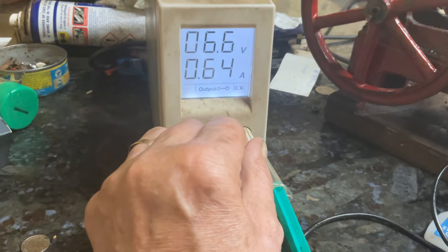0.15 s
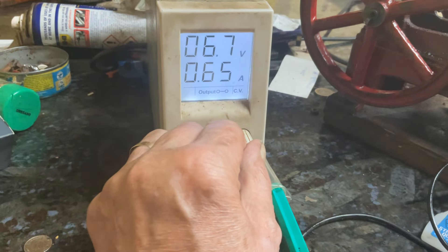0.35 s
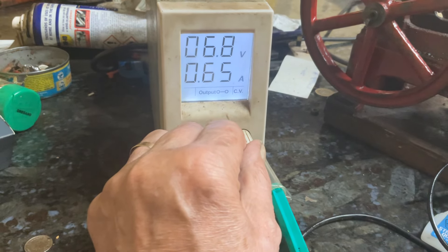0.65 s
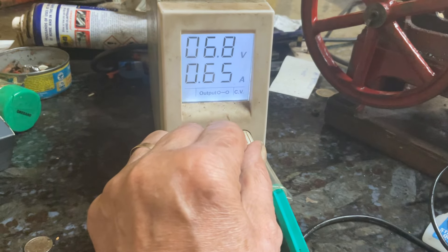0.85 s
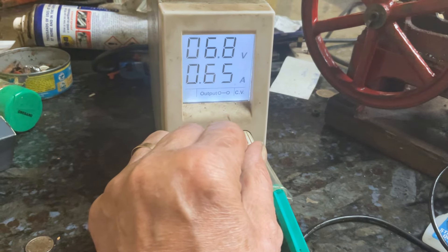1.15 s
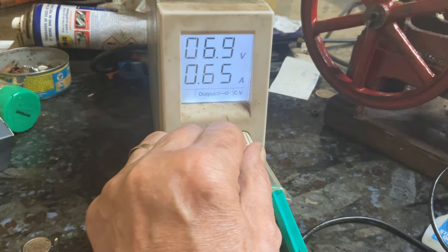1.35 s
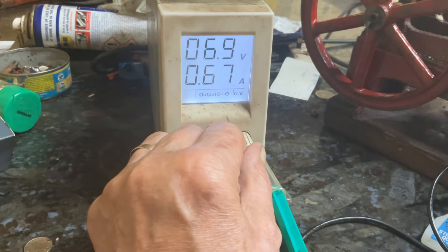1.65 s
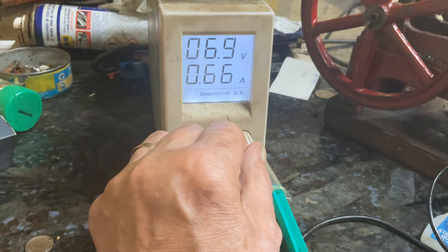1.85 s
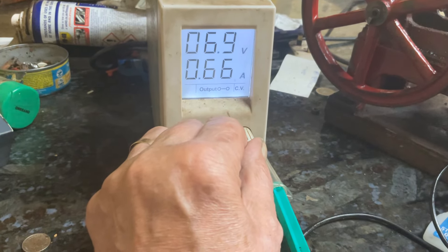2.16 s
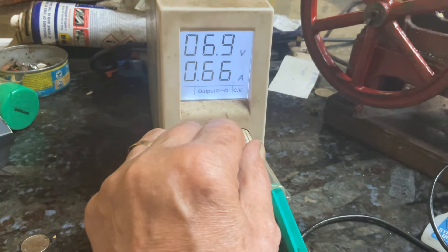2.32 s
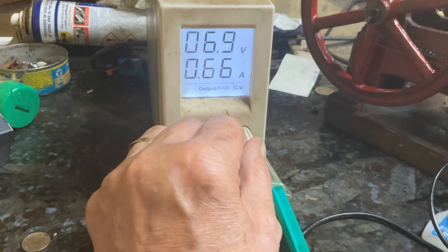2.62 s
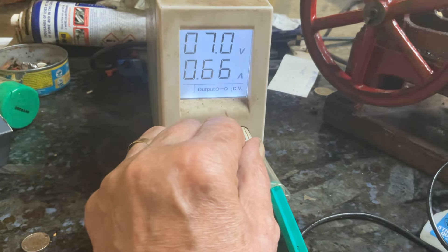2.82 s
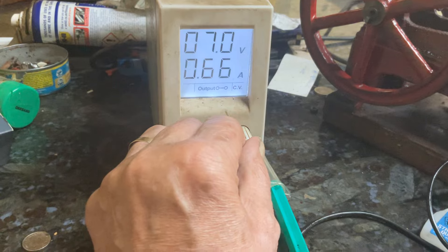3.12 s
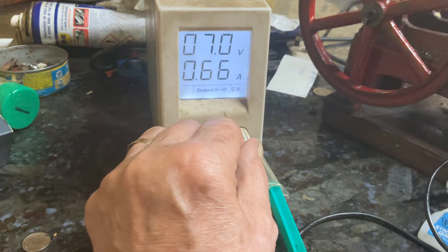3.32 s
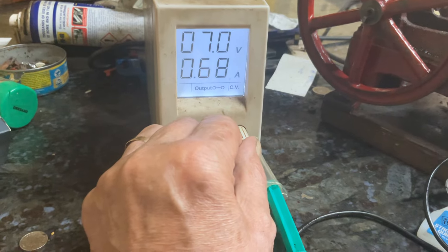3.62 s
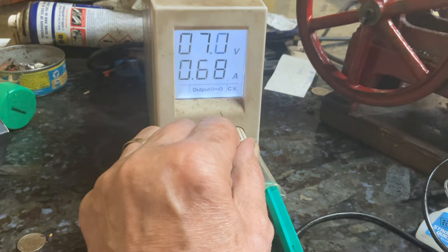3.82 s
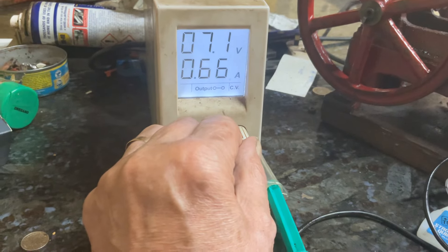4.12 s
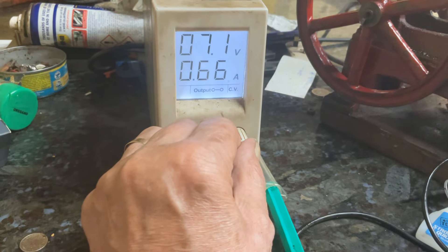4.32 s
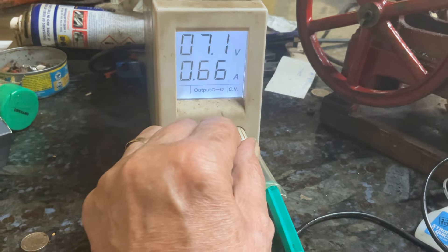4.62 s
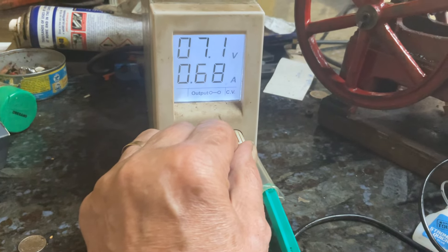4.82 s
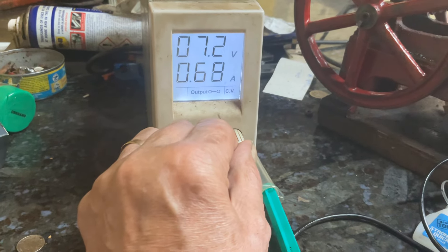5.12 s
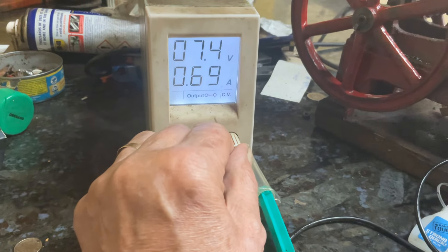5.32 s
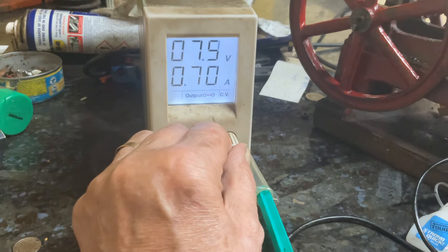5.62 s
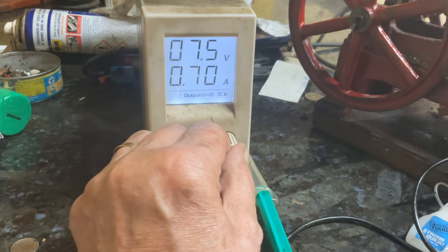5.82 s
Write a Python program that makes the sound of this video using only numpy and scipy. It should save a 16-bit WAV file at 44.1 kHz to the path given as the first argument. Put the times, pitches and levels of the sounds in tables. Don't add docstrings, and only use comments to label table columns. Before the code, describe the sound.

A spark unit on a cluttered workshop bench is already firing at the start and never stops for the full six seconds. About sixty-six slightly uneven cracks a second fuse into a harsh, dry, rasping buzz, with strong metallic sizzle around six to seven kilohertz and hiss up to about fifteen. Tight bench echoes and a short diffuse ring keep it dense. The close microphone overloads irregularly, adding short falling low pops and tiny dips in the crackle. Small pops cluster at 0.3-0.6 s; scattered stronger ones follow from 0.8 to 2.3 s. From 2.5 to 3.3 s they are heaviest, thumping and sputtering. They ease to scattered knocks from 3.4 to 5 s, while the rate quickens noticeably near 4.8 s, reaching about eighty a second. Another rough burst comes around 5.6-5.9 s. A steady, very faint low rumble remains underneath, and firing continues to the cut.

```python
import sys
import numpy as np
from scipy import signal
from scipy.fft import rfft, irfft
from scipy.io import wavfile
from scipy.ndimage import uniform_filter1d

SR = 44100
rng = np.random.default_rng(int(sys.argv[2]) if len(sys.argv) > 2 else 0)


def file_out(sig):
    cols = np.atleast_2d(sig).T
    lim = np.clip(cols, -1, 1)
    pcm = np.round(lim * 32767).astype(np.int16)
    wavfile.write(sys.argv[1], SR, pcm)


def boost_factor(decibels):
    exponent = np.asarray(decibels, float) / 20
    return 10 ** exponent


N = 263178
LEAD = 16384

# (t/s, time between sparks/ms)
SPARK_PERIOD = [(0, 15.2), (.55, 15.2), (.65, 14.5), (4.7, 14.3), (4.9, 13.4), (5.2, 12.9), (6, 12.5)]
# (t/s, level/dB, arc position 0-1)
SUPPLY = [(0, 0, -3.5), (2, 0, -2), (4.2, 0.5, 0.4), (4.9, 0, .8), (6, 0, 0.9)]
# (delay/ms, level/dB below 4.5 kHz, level/dB up to 9 kHz, level/dB above)
ECHOES = [(0.0, 2.5, -1, 0), (0.45, -7, -3, -7), (1.0, -7, -9, -9), (1.79, -9, -3, -5),
          (2.47, -9, -10, -14), (3.47, -10, -12, -9), (6.1, -11, -15, 2), (6.67, -17, -14, -6),
          (7.03, -11, -12, -1), (7.39, -12, -13, -1), (7.89, -13, -6, -3), (8.41, -5.5, -9, 3),
          (9.07, -9, -9, 1), (9.73, -10, -9, 1), (10.48, -12, -13, -16), (11.16, -13, -8, -12),
          (11.52, -13, -8, -10), (11.9, -18, -13, -9), (12.54, -13, -11, -15), (14.26, -13, -14, -12),
          (15.87, -15, -10, -6), (16.35, -12, -13, -11), (17.37, -15, -11, -11), (19.02, -11, -4, -7),
          (20.0, -12, -10, -10), (20.57, -16, -12, -6)]
# (lowest f/Hz, highest f/Hz, level/dB, t60/s)
SHOP_RING = [
    (60, 1500, -33, .3),
    (1500, 4500, -28, .28),
    (4500, 9000, -19.5, .27),
    (9000, 18000, -21, .28),
]
# (f/Hz, spectrum level/dB per Hz)
CRACK_SPECTRUM = [(80, -18.5), (560, -23), (980, -14), (1250, -16.5), (2100, -14), (2480, -9.5),
                  (2900, -14), (5700, -12.5), (6600, -2.5), (7300, -12.5), (8200, -23), (11200, -18.5),
                  (12500, -10), (15000, -2.5)]
# (f/Hz, width/Hz, added level/dB with the arc at 0, added level/dB at 1)
COMB_RIDGES = [(10100, 300, -4, -12), (11400, 250, -3, -12), (13100, 300, -2, -12), (14750, 400, -3, -8),
               (15500, 500, -14, -2)]
# (first delay/ms, second delay/ms)
JOLT_DELAYS = (8.43, 9.75)
# (t/s, first jolt/thousandths of full scale, jolt back/thousandths)
DOUBLE_JOLTS = [(.3372, -136, 79), (.3689, 51, 217), (.4001, 56, 177), (.4316, 38, 138), (.5073, 63, 181),
                (.5228, 47, 150), (.5375, 135, 207), (.5976, 6, 212), (1.7316, 37, 118), (2.156, 309, 139),
                (2.2696, 229, 193), (2.2851, 219, 353), (2.557, 99, 414), (2.6698, 124, 138),
                (2.6848, 314, 331), (2.7283, 96, 677), (2.801, 43, 195), (2.8895, 314, 423),
                (2.9039, 49, 223), (2.9492, 177, 450), (2.9637, 204, 186), (2.9779, 100, 171),
                (3.0356, 181, 352), (3.0654, 335, 425), (3.078, 222, 277), (3.0923, 268, 605),
                (3.4509, 104, 166), (3.7134, 147, 201), (5.6287, 57, 96), (5.6774, 408, 116)]
# (t/s, jolt/thousandths of full scale)
UP_JOLTS = [(.0035, 70), (.8326, 136), (1.0488, 97), (1.6298, 118), (1.6588, 208), (1.7455, 133),
            (1.7599, 161), (1.8022, 103), (1.931, 147), (2.1287, 378), (3.0059, 118), (3.136, 219),
            (3.2813, 144), (3.3529, 230), (3.4234, 126), (3.7416, 129), (3.7988, 115), (3.9017, 136),
            (3.9446, 139), (4.03, 233), (4.2025, 141), (4.615, 157), (4.6686, 129), (5.076, 168),
            (5.4396, 186), (5.5915, 240), (5.7033, 287), (5.7654, 259), (5.863, 172), (5.8876, 225)]
# (t/s, jolt/thousandths of full scale)
DOWN_JOLTS = [(.0971, 37), (.6844, 84), (.7742, 186), (.8034, 72), (.9181, 70), (1.1484, 178),
              (1.2222, 121), (1.3198, 139), (1.3504, 74), (1.4591, 133), (1.5863, 326), (1.6731, 90),
              (1.8741, 116), (1.9592, 139), (2.0006, 193), (2.0433, 348), (2.3128, 78), (2.3703, 117),
              (3.2094, 163), (3.252, 104), (3.2949, 122), (3.3097, 400), (3.5575, 61), (4.1874, 143),
              (4.8095, 70), (5.4666, 131), (5.6906, 215), (5.7161, 86), (5.7418, 131), (5.8507, 79)]
NUDGES = [.5532, .6416, 1.0061, 1.1338, 1.2354, 1.2655, 1.5023, 2.0999, 3.4368, 3.7275, 3.9873, 4.0149,
          4.0725, 4.129, 4.158, 4.2314, 4.275, 4.3885, 4.4621, 4.5612, 4.7549, 4.9036, 4.9835, 5.0238,
          5.2951, 5.4143, 5.5157, 5.5276, 5.5517, 5.6411]
# (t/s, level/dB full scale)
SMALL_JOLTS = [(0, -30.5), (.3, -38.5), (.6, -27.5), (1.3, -30), (1.55, -23.5), (2.3, -36.5), (2.5, -28.5),
               (3.4, -30), (3.65, -28), (4.3, -26.5), (4.8, -32.5), (5.15, -37), (5.3, -30), (6, -33)]
# (f/Hz, spectrum level/dB per Hz)
RUMBLE_SPECTRUM = [(24, -66), (48, -9), (125, 7), (525, -5), (578, -30), (628, -19), (700, -22), (910, -52),
                   (1540, -120)]

NUDGE_SIZE = 88
BACK_UP, BACK_DOWN = 0.099, 0.06


def level(x, db):
    return x * boost_factor(db) / np.sqrt(np.mean(x ** 2))


def colour(points, size=2048):
    hz, db = np.transpose(points)
    bin_hz = np.arange(size // 2 + 1) * SR / size
    log_gain = np.log(boost_factor(np.interp(np.log(bin_hz + 1), np.log(hz), db)))
    cepstrum = irfft(log_gain)
    cepstrum[1:size // 2] *= 2
    cepstrum[size // 2 + 1:] = 0
    return irfft(np.exp(rfft(cepstrum)))


def clicks(times, sizes):
    place = times * SR + LEAD
    taps = np.floor(place).astype(int)[:, None] + np.arange(-8, 9)
    offset = taps - place[:, None]
    window = np.cos(np.pi * offset / 18) ** 2
    out = np.zeros(N + 2 * LEAD)
    np.add.at(out, taps, sizes[:, None] * np.sinc(offset) * window)
    return out


def firing(jitter):
    up = np.r_[UP_JOLTS, [(s, NUDGE_SIZE) for s in NUDGES]]
    down = np.array(DOWN_JOLTS)
    up_rows = np.c_[up, BACK_UP * up[:, 1]]
    down_rows = np.c_[down[:, 0], -down[:, 1], -BACK_DOWN * down[:, 1]]
    rows = np.r_[DOUBLE_JOLTS, up_rows, down_rows]
    s, first, back = rows[np.argsort(rows[:, 0])].T
    s = np.r_[s[0] - .31, s, s[-1] + .073]

    t = np.arange(-LEAD, N) / SR
    turns = np.cumsum(1000 / np.interp(t, *np.transpose(SPARK_PERIOD))) / SR
    periods = np.round(np.diff(np.interp(s, t, turns)))
    number = np.r_[0, np.cumsum(periods)].astype(int)
    chance = rng.random((N // 500, 3))[:number[-1] + 1].T
    clock = np.cumsum(1 + jitter * np.sqrt(12) * (chance[0] - .5))
    times = np.interp(clock, clock[number], s)

    typical = boost_factor(np.interp(times, *np.transpose(SMALL_JOLTS)))
    small = typical * np.minimum(-np.log(1 - chance[1]), 1.6)
    rises = chance[2] < .75
    firsts = small * np.where(rises, 1, -1)
    backs = small * np.where(rises, BACK_UP, -BACK_DOWN)
    firsts[number[1:-1]] = first / 1000
    backs[number[1:-1]] = back / 1000
    return times, firsts, backs


def paths(echo_db, build_s):
    t = np.arange(LEAD) / SR
    delay_ms, low_db, mid_db, high_db = np.transpose(ECHOES)
    flip = np.sign(rng.standard_normal((len(ECHOES), 1))[:, 0])
    total = 0
    for db, (lo, hi, ring_db, t60) in zip((low_db, mid_db, high_db)[:1] + (low_db, mid_db, high_db), SHOP_RING):
        decay = boost_factor(ring_db - 60 * t / t60) * (1 - np.exp(-t / build_s))
        ring = decay * rng.standard_normal(LEAD)
        echoes = clicks(delay_ms / 1000, flip * boost_factor(db + echo_db))[LEAD:2 * LEAD]
        band = signal.butter(4, (lo, hi), "band", fs=SR, output="sos")
        total = total + signal.sosfilt(band, echoes + ring)
    broad_db = 10 * np.log10(uniform_filter1d(np.abs(rfft(total)) ** 2, size=90))
    bin_hz = np.arange(1, LEAD // 2 + 1) * SR / LEAD
    return signal.fftconvolve(total, colour(np.c_[bin_hz, -broad_db[1:]]))


def sparks(times, scatter_db, wander_db):
    chance = rng.standard_normal((N // 500, 2))[:len(times)].T
    s, level_db, arc = np.transpose(SUPPLY)
    size = boost_factor(np.interp(times, s, level_db) + scatter_db * chance[0])
    steady = signal.fftconvolve(clicks(times, size), paths(echo_db=2.73, build_s=0.01))
    moved = signal.fftconvolve(clicks(times, size * chance[1]), paths(echo_db=-4.0, build_s=.004))
    heard = signal.fftconvolve(steady + boost_factor(wander_db) * moved, colour(CRACK_SPECTRUM))
    heard = heard[LEAD:LEAD + N]

    arc = np.interp(np.arange(N) / SR, s, arc).clip(0, 1)
    ridges = 0
    for hz, width, start_db, end_db in COMB_RIDGES:
        ridge = signal.lfilter(*signal.iirpeak(hz, hz / width, fs=SR), heard)
        ridges = ridges + boost_factor(start_db + arc * (end_db - start_db)) * ridge
    return level(heard + ridges, -15.5)


def overload(times, first, back, depth, release_ms):
    fade = np.exp(-np.arange(LEAD) / SR * 1000 / release_ms)
    blows = clicks(times + JOLT_DELAYS[1] / 1000, np.hypot(first, back))
    return 1 / (1 + depth * signal.fftconvolve(blows, fade)[LEAD:LEAD + N].clip(0))


def jolts(times, first, back, soft_hz, trim_db):
    steps = clicks(times + JOLT_DELAYS[0] / 1000, first) - clicks(times + JOLT_DELAYS[1] / 1000, back)
    soft = signal.butter(1, soft_hz, fs=SR, output="sos")
    drift = signal.butter(3, 46, "high", fs=SR, output="sos")
    return boost_factor(trim_db) * signal.sosfiltfilt(np.r_[soft, drift], np.cumsum(steps))[LEAD:LEAD + N]


def shop_rumble():
    rumble = signal.fftconvolve(rng.standard_normal(N), colour(RUMBLE_SPECTRUM, size=8192))
    return level(rumble[:N], -57.5)


def scene():
    times, first, back = firing(jitter=.035)
    cracks = sparks(times, scatter_db=1.0, wander_db=-12)
    cracks = cracks * overload(times, first, back, depth=1.0, release_ms=6.4)
    pops = jolts(times, first, back, soft_hz=3780, trim_db=1.5)
    return (cracks + pops + shop_rumble())[None]


def smear(x, hz, count):
    warp = np.tan(np.pi * hz / SR)
    c = (1 - warp) / (1 + warp)
    for _ in range(count):
        x = signal.lfilter([c, -1], [1, -c], x)
    return x


def low_pass(x):
    return signal.sosfilt(signal.butter(12, 16990, fs=SR, output="sos"), x)


def record(dry):
    cut = signal.butter(2, 69, "high", fs=SR, output="sos")
    x = signal.sosfilt(np.r_[cut, cut], dry)
    x = smear(x, 77, count=5)
    x = smear(x, 315, count=3)
    x = signal.sosfilt(signal.ellip(12, .2, 80, 15690, fs=SR, output="sos"), x)
    return low_pass(x)


dry = scene()
out = record(dry)
file_out(out)
```